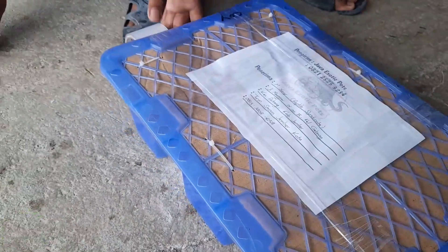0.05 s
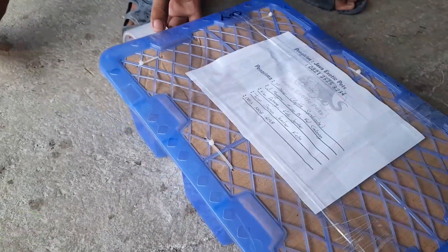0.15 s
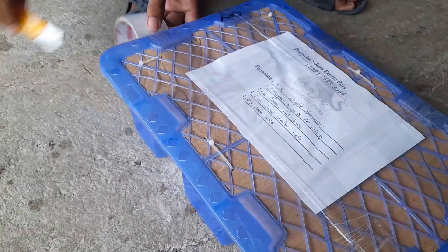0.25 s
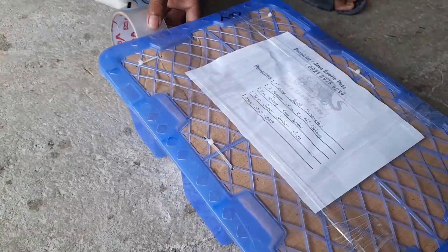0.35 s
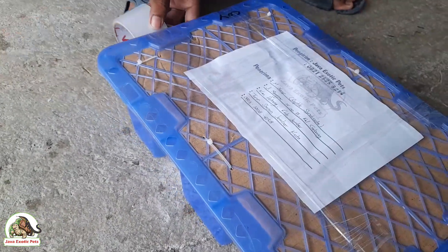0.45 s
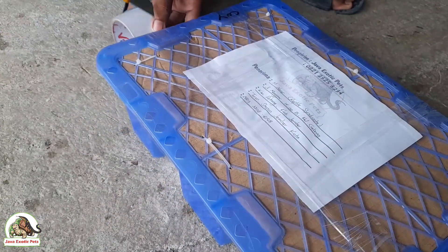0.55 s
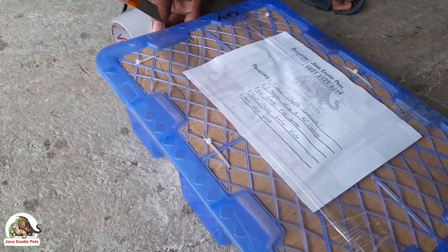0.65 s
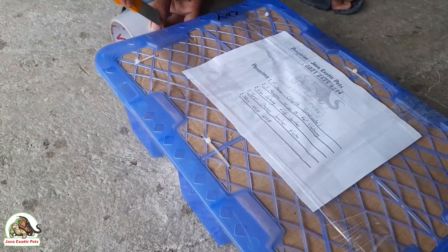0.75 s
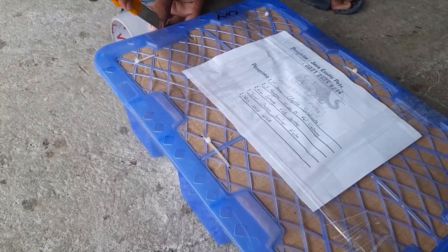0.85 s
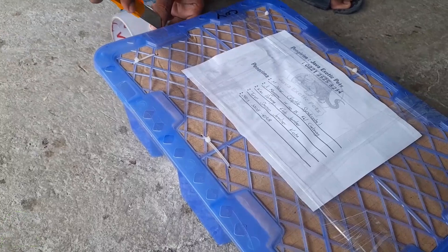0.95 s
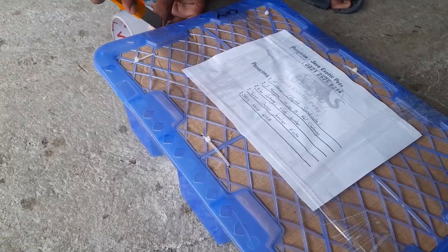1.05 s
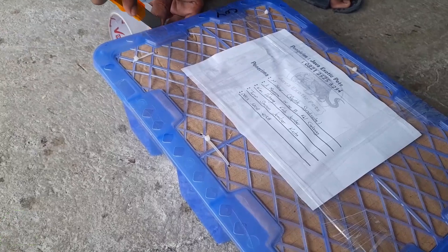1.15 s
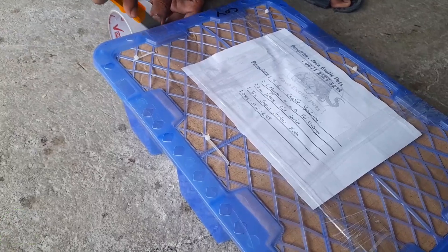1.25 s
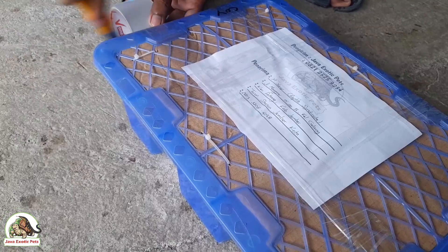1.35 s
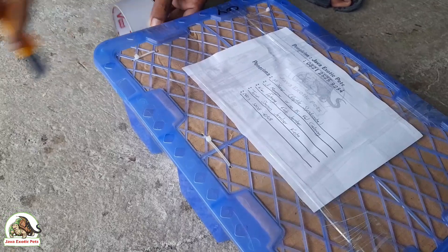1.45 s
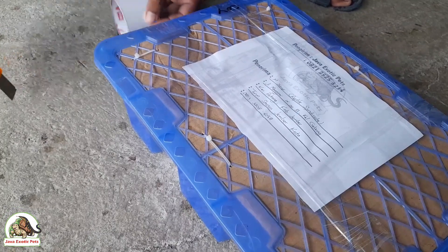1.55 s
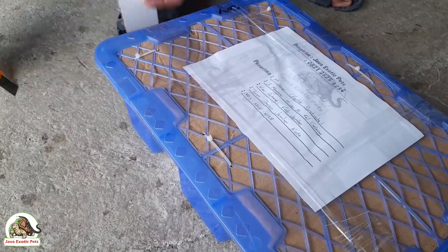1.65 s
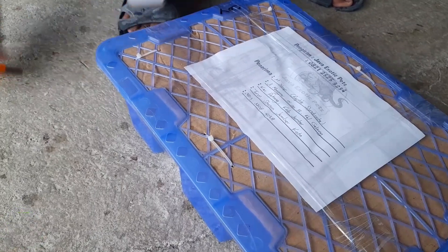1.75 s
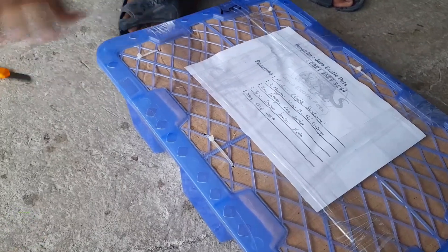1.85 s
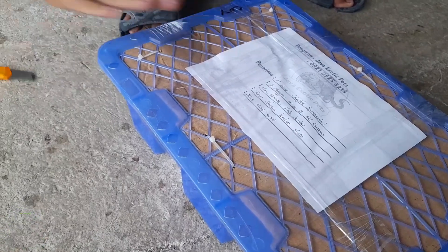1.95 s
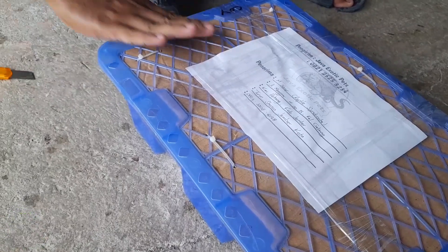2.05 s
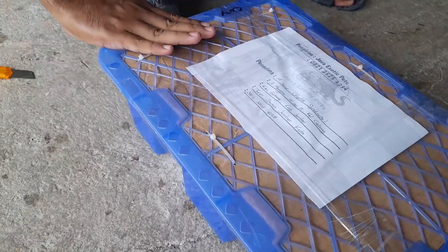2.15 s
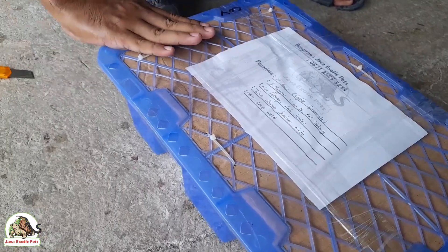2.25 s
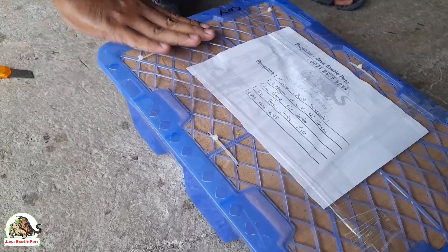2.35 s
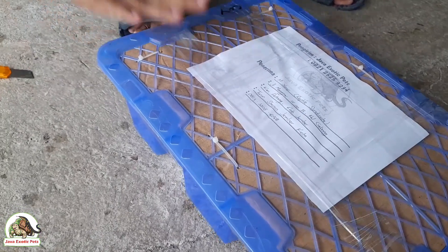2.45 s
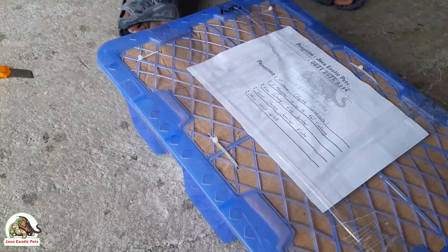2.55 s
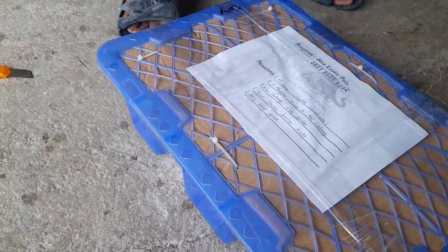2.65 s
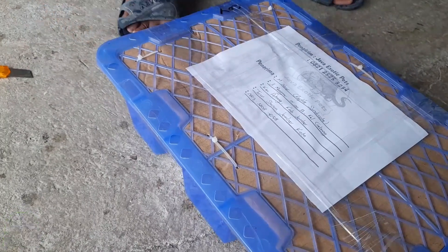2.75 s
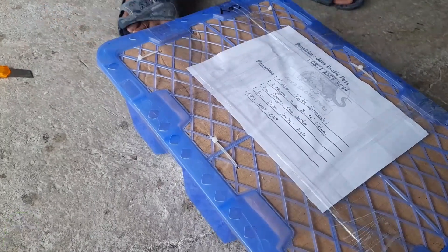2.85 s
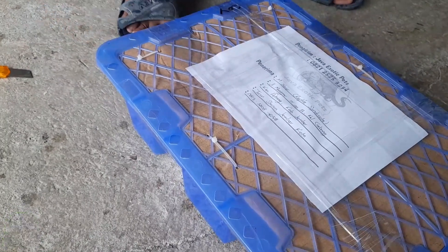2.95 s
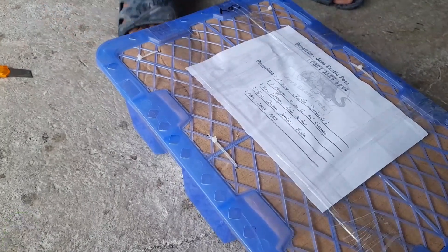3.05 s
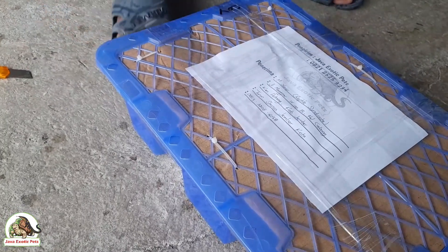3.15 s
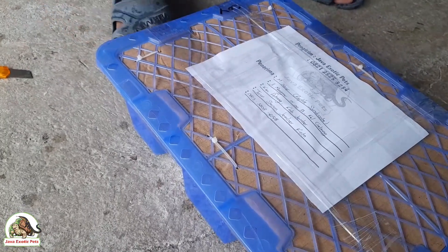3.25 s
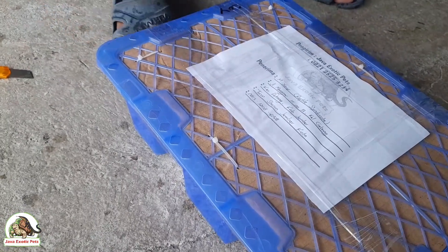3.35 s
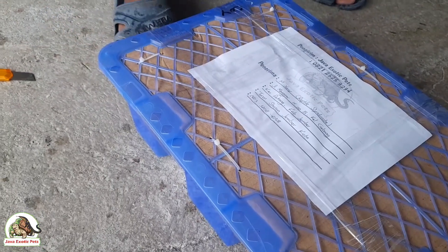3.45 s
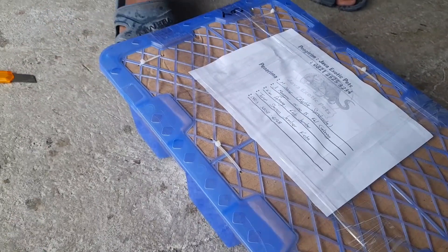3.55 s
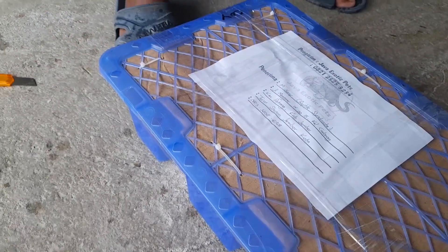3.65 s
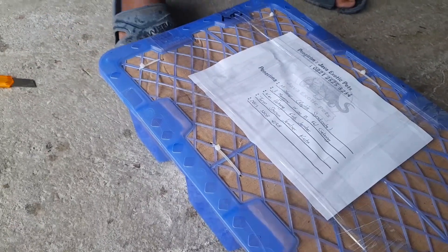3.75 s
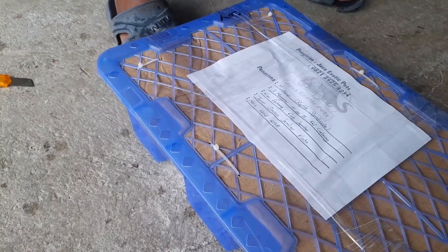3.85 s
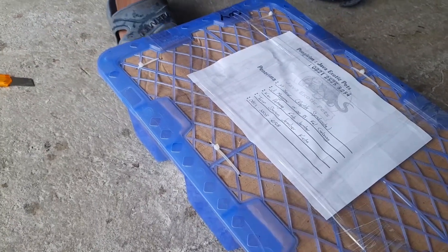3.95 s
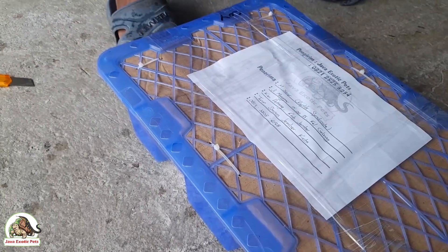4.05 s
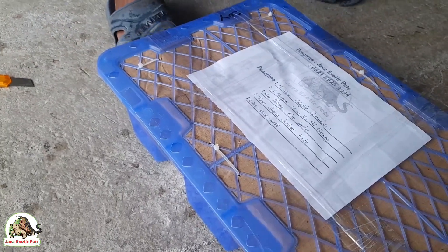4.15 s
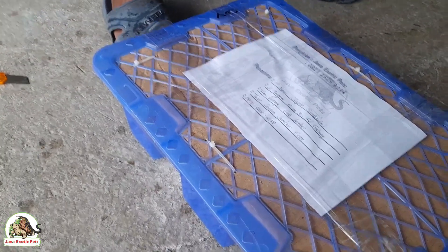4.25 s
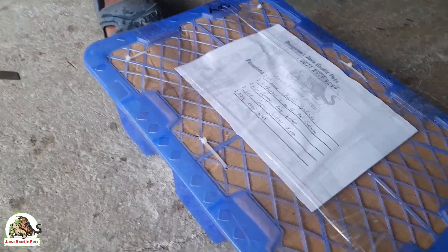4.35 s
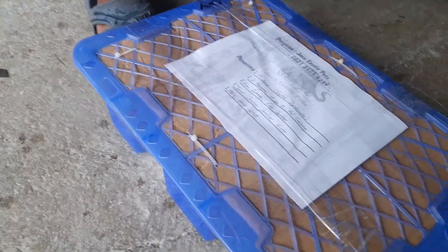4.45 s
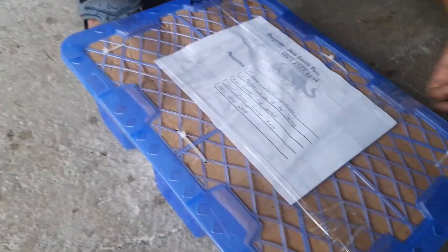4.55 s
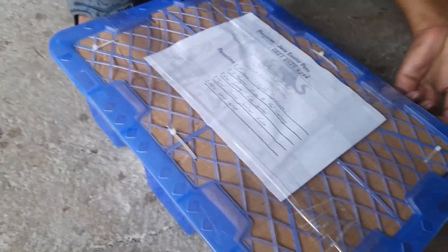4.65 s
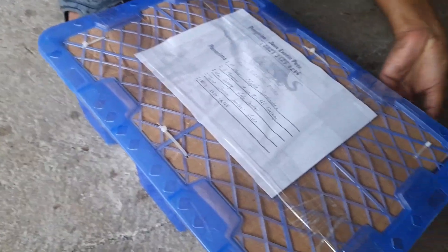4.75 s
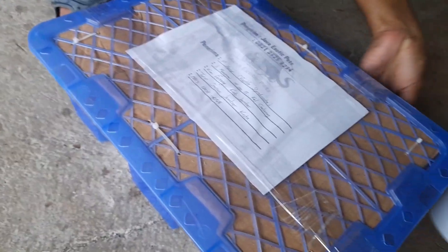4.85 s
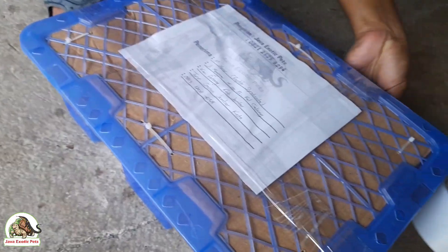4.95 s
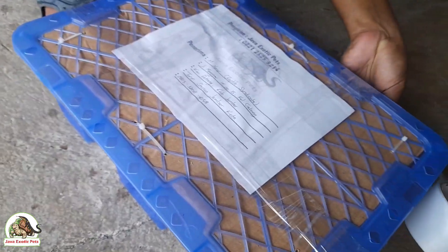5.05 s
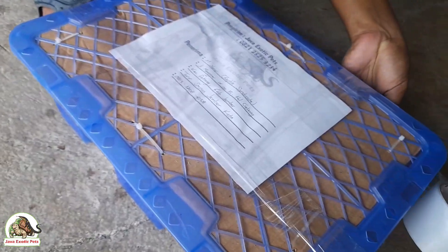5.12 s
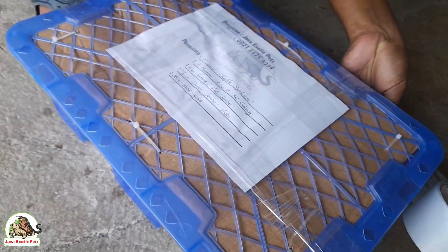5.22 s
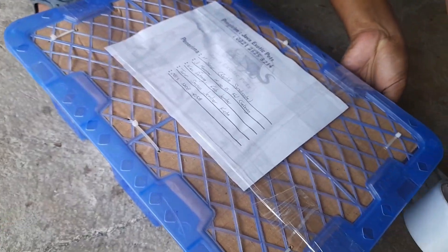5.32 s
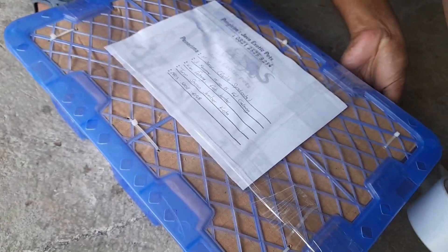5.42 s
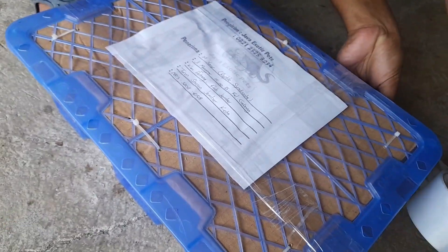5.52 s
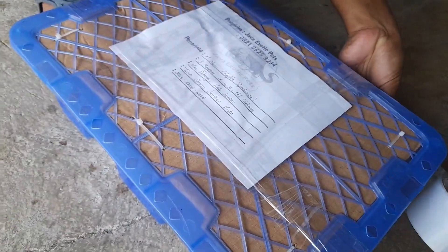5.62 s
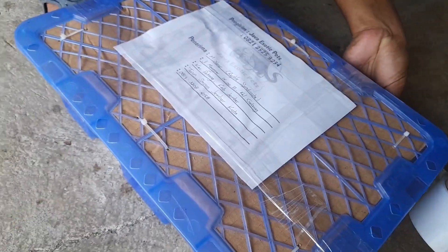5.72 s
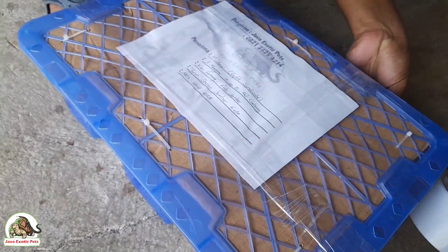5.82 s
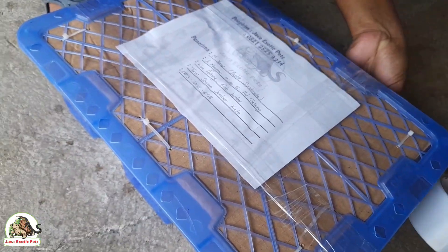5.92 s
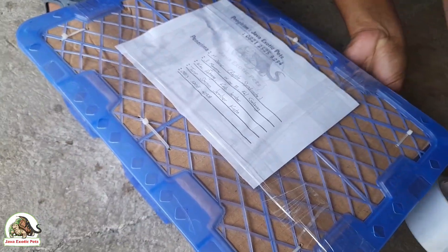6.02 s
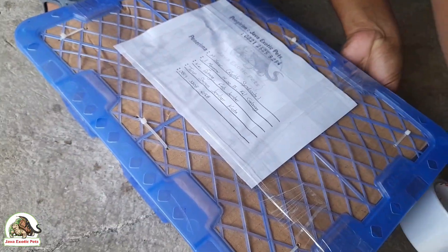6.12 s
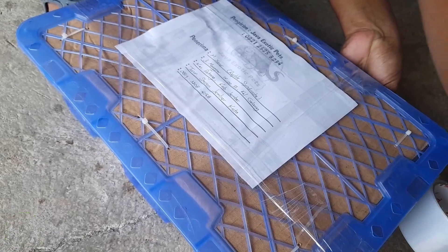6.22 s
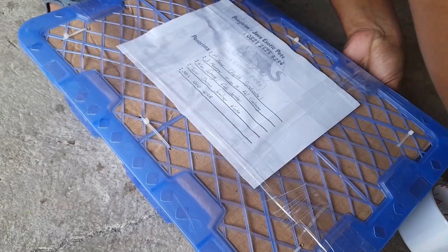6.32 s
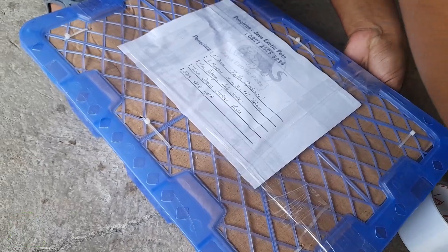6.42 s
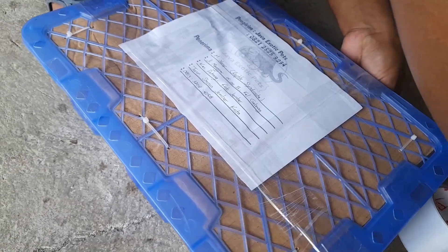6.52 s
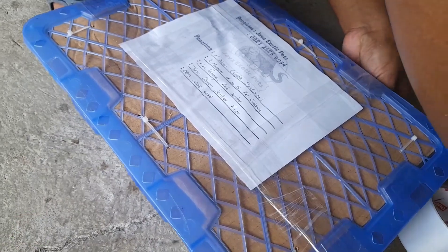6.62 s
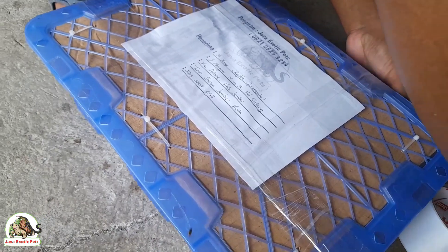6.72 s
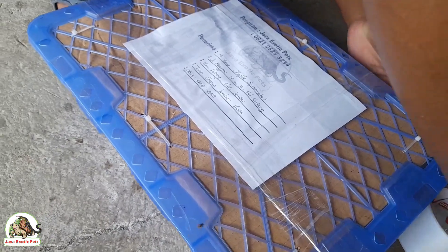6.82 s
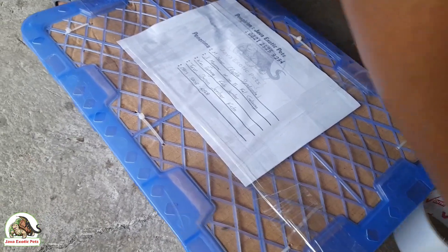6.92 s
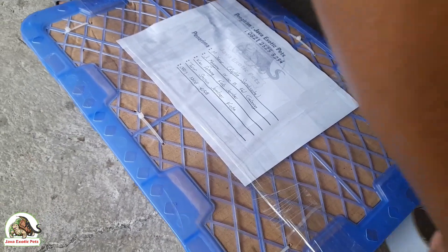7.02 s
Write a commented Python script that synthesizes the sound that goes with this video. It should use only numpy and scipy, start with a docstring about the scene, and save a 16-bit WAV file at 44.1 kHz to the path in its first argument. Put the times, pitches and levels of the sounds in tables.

```python
"""Sticky tape is peeled off a roll, cut and smoothed over a label on a plastic crate that stands on concrete.
Releases are bursts of shaped noise over fine crackle and the hands' rustle; knocks ring the crate's modes;
strokes are swelling hiss and shake; hard walls answer with decaying noise.
Behind: traffic rumble and hiss in shaped noise; a hum, a low throb and an engine drone in drifting sines;
a far call, perhaps a rooster, in blurred lines."""
import sys
import numpy as np
from scipy import signal
from scipy.fft import rfft, irfft, next_fast_len
from scipy.io import wavfile
from scipy.ndimage import map_coordinates

SR = 44100
rng = np.random.default_rng(int(sys.argv[2]) if len(sys.argv) > 2 else 0)


def store_wav(level_fs):
    """Save 16-bit WAV to argv[1]."""
    pcm = np.round(np.clip(np.atleast_2d(level_fs), -1, 1) * 32767)
    wavfile.write(sys.argv[1], SR, pcm.T.astype(np.int16))


def level_to_linear(level):
    """Convert decibel levels to linear amplitude factors, elementwise."""
    exponent = np.asarray(level, float) / 20
    return 10 ** exponent


N = 312212  # samples

# tape letting go of the roll or the label: t/s, level/dB, tearing decay of a full-size release/ms
SNAPS = [(0.093, -33.5, 12), (0.1148, -25, 14), (.139, -17.5, 4), (0.3407, -32.5, 1.7), (0.4, -25, 1.8),
         (0.479, -30, 5.9), (0.7538, -37.5, 5), (0.9697, -37.5, 2.3), (1.119, -42, 9), (1.337, -32, 3.2),
         (1.3938, -25.5, 1.5), (1.4561, -25, 0.81), (1.7422, -29.5, 7.9), (1.821, -12, 7.7),
         (1.8422, -8, 5.8), (1.9067, -16, 2), (1.931, -10.5, 4), (1.9709, -15, 0.72), (2.0569, -18, 10),
         (2.0802, -19, 2.4), (2.6745, -37.5, 3), (2.8958, -40.5, 0.58), (3.0988, -31, 2.5),
         (3.387, -39.5, .7), (3.499, -30.5, .7), (3.7932, -34, 1.9), (3.8842, -29, 2.2), (3.98, -35.5, 8.1),
         (4.0045, -21.5, 1.7), (4.0281, -24, 1.6), (4.0502, -19, 1.2), (4.096, -13, 1.3),
         (4.4101, -17, 3.8), (4.4266, -6, 6), (4.4496, -8.5, 3.6), (4.4733, -8, 4), (4.7718, -36.5, 2),
         (5.9, -50.5, 2.1), (6.6655, -29.5, 2.5)]
# blows on the crate: t/s, level/dB, hardness/dB
KNOCKS = [(0.26, -34.5, -12), (.32, -39.5, -6), (0.447, -37, -15), (.511, -38, -9.5), (.62, -42.5, 3.5),
          (0.66, -33, -9.5), (1.124, -23, -18.5), (1.452, -25.5, -15.5), (1.486, -33.5, 3),
          (1.491, -10, -26), (2.262, -31.5, -16), (2.504, -28, -20), (2.515, -26.5, -23),
          (4.396, -4.5, -14.5), (4.4, -6, -7.5), (4.409, -11, 4), (4.422, -11.5, -6), (4.444, -20, 11),
          (4.469, -21, 11), (6.427, -32, -5.5), (6.544, -27, -16.5), (6.664, -34.5, 4)]
# skin or plastic sliding: start t/s, end t/s, hiss level/dB, crate shake level/dB
STROKES = [(1.111, 1.15, -52.5, -39), (1.183, 1.27, -49.5, -50), (1.268, 1.524, -46.5, -46),
           (2.204, 2.36, -29.5, -34.5), (2.34, 2.403, -26.5, -39.5), (2.392, 2.441, -33.5, -41.5),
           (4.366, 4.415, -43, -21.5), (4.423, 4.507, -18, -23.5), (5.655, 5.946, -69, -62),
           (6.525, 6.637, -50.5, -39), (6.665, 6.719, -40, -39), (6.896, 7.001, -43, -28.5),
           (6.985, 7.036, -46, -32)]
# spells of handling the tape: start t/s, end t/s, crackle level/dB, rustle of hands and paper level/dB
SPELLS = [(0.118, 0.803, -69.5, -51.5), (1.026, 1.501, -59.5, -56), (1.761, 2.199, -45.5, -57),
          (3.0, 3.499, -58.5, -54), (3.778, 4.365, -59.5, -53), (4.454, 4.795, -65, -56),
          (5.95, 7.078, -73.5, -59.5)]
# traffic: t/s, rumble level/dB
STREET = [(0, -59.5), (.4, -59), (.9, -61.5), (2.2, -46), (2.7, -55), (4.1, -45), (4.95, -59.5), (5.6, -60),
          (6, -49), (7.08, -43.5)]
# engine drone: t/s, mean firing f/Hz, level/dB
DRONE = [(5.5, 60.1, -69), (5.892, 59.46, -55), (6.9, 59.77, -56)]
# engine orders 1-6: relative level/dB
ORDER_DB = [2, 7, 3.5, -1.5, -1, -3]
# hum lines: mean f/Hz, relative level/dB
HUM_LINES = [(151, -3), (188, -15.5), (366, -15), (580, -20.5)]
# swells of the hum: peak t/s, half width at 1/e/s, level/dB
HUM_SWELLS = [(2.4, 0.21, -45), (3.601, .5, -42), (6.601, 0.053, -33)]
# notes of a far call, perhaps a rooster: start t/s, end t/s, mean f/Hz, starting level/dB
CALL = [(-.1, .2, 563, -61), (.2, 1.3, 745, -60)]
# the call's harmonics from the first: relative level/dB
OVERTONE_DB = [0, -11, -19]
# crate resonances: f/Hz, width/Hz, level/dB
CRATE = [(90, 28, -9.5), (223, 66, 0.5), (603, 70, 5), (731, 59, 5.5), (1080, 56, 2.5), (1882, 150, -1.5)]
# taped label ringing under the hand: f/Hz, width/Hz, level/dB
SHEET = [(1310, 250, 1), (3960, 250, 1), (4930, 200, 0.5)]
# spectrum of tearing glue: f/Hz, level per Hz/dB
TAPE = [(500, -29.5), (1500, -22), (2270, 0.5), (4330, 3.5), (9000, -2.5), (15600, -8.5)]
# spectrum of sliding skin: f/Hz, level per Hz/dB
SKIN = [(200, -28), (400, -11.5), (1250, -9.5), (4000, -11), (6000, -15), (15600, -28)]
# crate walls under a sliding load: f/Hz, level per Hz/dB
DRAG = [(60, -14), (270, -2.5), (450, -7), (730, -11), (1200, -13), (2500, -26.5), (8000, -49)]
# spectrum of traffic rumble: f/Hz, level per Hz/dB
TRAFFIC = [(25, -37), (52, -12), (150, -6.5), (210, -13.5), (310, -11.5), (600, -21), (900, -37),
           (1300, -81)]
# spectrum of far hiss, shared by the hands' rustle: f/Hz, level per Hz/dB
FAR_HISS = [(500, -8), (900, -7), (2500, -7), (5000, -15), (15000, -21.5)]
# likeness of the two ports: f/Hz, correlation/1
ALIKE = [(30, 0.022), (70, 0.92), (150, 0.62), (290, .85), (640, 0.33), (1400, 0.23), (3000, 0)]
# decay of the walls' answer: f/Hz, t60/s
WALLS = [(150, 0.25), (1000, 0.49), (5000, 0.32), (12000, 0.32)]
# crack of a hard contact: f/Hz, level/dB
CRACK = [(300, -36.0), (1200, 11.0), (3000, 6.5), (8000, -18.5)]

HISS_DB, HISS_GROWTH_DB_PER_DB = -64.5, 1  # at the mean rumble level; per dB of rumble
HUM_REST_DB = -56.5
THROB_HZ, THROB_DB = 66, -60.5  # means
CALL_FADE_DB_PER_S = 8
BUILD_S, AFTER_DB, AFTER_S = 0.0026, -14.5, 0.022  # strain before a full-size release; ragged trail
TICKS_PER_S, TICK_DB, TICK_SPREAD_DB, TICK_MS = 22, 12.5, 4.5, 0.66  # dB over crackle; mean ms
TAPS_PER_S, TAP_DB, TAP_SPREAD_DB, TAP_HARD_DB = 12, 9, 2, -14  # dB over rustle; mean hardness
REST_DB = -95  # crackle floor
SPELL_RISE_S, SPELL_FALL_S = 0.15, 0.064


def unit(x):
    """Scaled to rms 1."""
    return x / np.sqrt(np.mean(x ** 2) + 1e-20)


def along(points, hz):
    """(f/Hz, value) points on a log axis."""
    f, v = np.transpose(points)
    return np.interp(np.log(hz + 1), np.log(f + 1), v)


def curves(rows):
    """One value per sample for each column after the time."""
    s, *cols = np.transpose(rows)
    return [np.interp(np.arange(N) / SR, s, c) for c in cols]


def wobble(rate):
    """Smooth random curve, rate knots a second."""
    return map_coordinates(rng.standard_normal(N // 50), [np.arange(N) * rate / SR])


def drifting_turns(hz, depth, rate):
    """Phase in turns of a tone whose pitch drifts by the fraction depth."""
    return np.cumsum(hz * (1 + depth * wobble(rate))) / SR


def filtered(x, response):
    """x through a complex response of frequency."""
    m = next_fast_len(N + SR // 2)
    return irfft(rfft(x, m) * response(np.fft.rfftfreq(m, 1 / SR)), m)[..., :N]


def colour(points):
    """Gain of a (f/Hz, level/dB) spectrum."""
    return lambda hz: level_to_linear(along(points, hz))


def modes(table):
    """Causal response of (f/Hz, width/Hz, level/dB) resonances, alternating in sign."""
    def response(f):
        total = 0
        for k, (centre, width, db) in enumerate(table):
            damping = 1j * f * width
            total = total + (-1) ** k * level_to_linear(db) * damping / (centre ** 2 - f ** 2 + damping)
        return total
    return response


def half_angle(hz):
    """Mid/side mixing angle that gives the ports the correlation of ALIKE."""
    return np.arccos(np.clip(along(ALIKE, hz), -1, 1)) / 2


def pair(response, grain_db):
    """Stereo noise of rms 1, correlated as in ALIKE, in lumps of random size shared by both ports."""
    lumps = level_to_linear(grain_db * wobble(260))
    noise = lumps * rng.standard_normal((2, N))
    mid, side = filtered(noise, lambda hz: response(hz) * [np.cos(half_angle(hz)), np.sin(half_angle(hz))])
    return unit(np.array([mid + side, mid - side]))


def spell(start, end):
    """Rises from the start, holds, dies away after the end."""
    t = np.arange(N) / SR
    return np.clip((t - start) / SPELL_RISE_S, 0, 1) * np.exp(-np.clip(t - end, 0, None) / SPELL_FALL_S)


def traffic():
    """Many far sources blur into low rumble and a hiss that follows its level."""
    rumble_db, = curves(STREET)
    hiss_db = HISS_DB + HISS_GROWTH_DB_PER_DB * (rumble_db - rumble_db.mean())
    rumble = level_to_linear(rumble_db + 2 * wobble(8)) * pair(colour(TRAFFIC), grain_db=-0.5)
    hiss = level_to_linear(hiss_db + 1.5 * wobble(10)) * pair(colour(FAR_HISS), grain_db=1.5)
    return rumble + hiss


def hum():
    """Steady lines, wavering in level and pitch, swell together."""
    t = np.arange(N) / SR
    gain = level_to_linear(HUM_REST_DB) + sum(level_to_linear(db) * np.exp(-((t - s) / half) ** 2) for s, half, db in HUM_SWELLS)
    lines = sum(level_to_linear(db + 0.8 * wobble(16)) * np.sin(2 * np.pi * drifting_turns(hz, 0.003, 4))
                for hz, db in HUM_LINES)
    return gain * lines


def throb():
    """One low sine, unsteady in level and pitch."""
    return level_to_linear(THROB_DB + 2.8 * wobble(19)) * np.sin(2 * np.pi * drifting_turns(THROB_HZ, 0.056, 10))


def far_call():
    """Each note is a blurred, drifting line with weak overtones, fading as it goes."""
    out, t = 0, np.arange(N) / SR
    for start, end, hz, db in CALL:
        phase = 2 * np.pi * drifting_turns(hz, 0.012, 7)
        note = 0
        for k, over_db in enumerate(OVERTONE_DB, 1):
            in_phase = (0.8 + 0.8 * wobble(60 * k)) * np.sin(k * phase)
            quadrature = 0.8 * wobble(60 * k) * np.cos(k * phase)
            note = note + level_to_linear(over_db) * (in_phase + quadrature)
        out = out + level_to_linear(db - CALL_FADE_DB_PER_S * (t - start)) * spell(start, end) * note
    return out


def ticks():
    """Small releases at random moments after each spell's rise, as rows like SNAPS."""
    rows = []
    for start, end, crackle_db, _ in SPELLS:
        when, size, length = rng.random((round(TICKS_PER_S * (end - start)), 3)).T
        at_s = end - when * (end - start - SPELL_RISE_S)
        level_db = crackle_db + TICK_DB - TICK_SPREAD_DB * np.log(size + 0.14)
        rows += zip(at_s, level_db, TICK_MS * (0.5 + length))
    return rows


def tape_snaps():
    """Glue strains, tears for milliseconds and lets go; small releases are shorter and brighter."""
    near, far = np.zeros((2, N + SR)), np.zeros(N)
    t = np.arange(-SR // 50, SR // 10) / SR
    for s, db, tear_ms in SNAPS + ticks():
        size = np.clip((db + 45) / 35, 0, 1)
        fall_s = tear_ms / 1000
        shape = np.exp(np.where(t < 0, t / BUILD_S, -t / fall_s) / (0.55 + 0.45 * size))
        ragged = level_to_linear(4 * np.repeat(rng.standard_normal(len(t) // 100 + 1), 100)[:len(t)])
        after = level_to_linear(AFTER_DB) * (t > 0) * np.exp(-t / AFTER_S) * ragged
        noise = rng.standard_normal(len(t))
        glue = unit(noise - 0.39 * (1 - size) * np.roll(noise, 1))
        burst = level_to_linear(db + 3.5) * (shape + after) * glue
        at = round(s * SR) - SR // 50
        lag = rng.integers(3, 15)  # samples; earlier but weaker at the left port
        near[0, at - lag:at - lag + len(t)] += level_to_linear(-2.5) * burst
        near[1, at:at + len(t)] += burst
        # the walls receive each release as one pulse
        pulse = unit(np.array([1, 0.7 * (size - 1)]))
        far[round(s * SR):][:2] += level_to_linear(db) * (fall_s / 0.0059) ** 0.5 * np.linalg.norm(shape) * pulse
    level = np.sqrt(np.mean(colour(TAPE)(np.linspace(2500, 14000, 99)) ** 2))
    close = filtered(near[:, :N], lambda hz: colour(TAPE)(hz) ** 0.65) / level ** 0.65  # fuller close by
    return close, filtered(far, colour(TAPE)) / level


def walls(x):
    """The yard's answer: each frequency dies at its own speed, with a new tail every third of a second."""
    out, step, delay = np.zeros((2, N + 2 * SR)), SR // 3, round(0.006 * SR)
    for at in range(0, N, step):
        hz, t, (a, b) = signal.stft(rng.standard_normal((2, SR * 2 // 3)), SR, nperseg=256)
        angle = half_angle(hz)[:, None]
        mid, side = np.cos(angle) * a, np.sin(angle) * b
        fall = level_to_linear(-60 * t / along(WALLS, hz)[:, None]) * (1 - np.exp(-t / 0.004))  # echoes thicken, then die
        tail = signal.istft(np.array([mid + side, mid - side]) * fall, SR, nperseg=256)[1]
        piece = signal.fftconvolve(x[None, at:at + step], tail / np.linalg.norm(tail[0]), axes=1)
        out[:, at + delay:at + delay + piece.shape[1]] += piece
    return out[:, :N]


def crackle_and_rustle():
    """Clumped fine noise for tiny releases as tape is stretched and pressed; lumpy noise for the hands."""
    fine = level_to_linear(REST_DB) + sum(level_to_linear(db) * spell(start, end) for start, end, db, _ in SPELLS)
    rustle = sum(level_to_linear(db) * spell(start, end) for start, end, _, db in SPELLS)
    crackle_noise = pair(lambda hz: colour(TAPE)(hz) * (hz / 6000) ** 0.25, grain_db=0)
    rustle_noise = pair(colour(FAR_HISS), grain_db=4.5)
    return fine * level_to_linear(3.5 * wobble(30)) * crackle_noise + rustle * level_to_linear(2.5 * wobble(14)) * rustle_noise


def taps():
    """Light fingertip blows at random moments after each spell's rise, as rows like KNOCKS."""
    rows = []
    for start, end, _, rustle_db in SPELLS:
        when, size, hard = rng.random((round(TAPS_PER_S * (end - start)), 3)).T
        at_s = end - when * (end - start - SPELL_RISE_S)
        level_db = rustle_db + TAP_DB - TAP_SPREAD_DB * np.log(size + 0.15)
        rows += zip(at_s, level_db, TAP_HARD_DB * (0.5 + hard))
    return rows


def crate_knocks():
    """A push rings the crate's modes; a harder contact pushes more briefly and cracks louder."""
    push, crack = np.zeros(N + SR), np.zeros(N + SR)
    t = np.arange(SR // 30) / SR
    for s, db, hard_db in KNOCKS + taps():
        at = round(s * SR)
        u = t / (0.000096 * level_to_linear(-0.7 * hard_db))
        force = u * np.exp(-u)
        push[at:at + len(t)] += level_to_linear(db + 37) * force / np.sum(force)
        crack[at:at + len(t)] += level_to_linear(db + hard_db) * np.exp(-t / 0.005) * rng.standard_normal(len(t))
    return filtered(push[:N], modes(CRATE)) + filtered(crack[:N], colour(CRACK))


def rubbing():
    """Each stroke swells and stops: the skin hisses and the crate's walls shake."""
    t, hiss_gain, shake_gain = np.arange(N) / SR, 0, 0
    for start, end, hiss_db, shake_db in STROKES:
        stroke = np.sin(np.pi * np.clip((t - start) / (end - start), 0, 1)).clip(0) ** 0.85
        hiss_gain = hiss_gain + level_to_linear(hiss_db) * stroke
        shake_gain = shake_gain + level_to_linear(shake_db) * stroke
    shake = pair(lambda hz: colour(DRAG)(hz) * (1 + 1.1 * np.abs(modes(CRATE)(hz))), grain_db=2.5)
    hiss = pair(lambda hz: colour(SKIN)(hz) * (1 + np.abs(modes(SHEET)(hz))), grain_db=2.2)
    return level_to_linear(1.5 * wobble(40)) * (hiss_gain * hiss + shake_gain * shake)


def engine_drone():
    """Low multiples of a drifting firing rate, each wavering in level."""
    firing_hz, drone_db = curves(DRONE)
    phase = 2 * np.pi * drifting_turns(firing_hz, 0.003, 4)
    orders = sum(level_to_linear(db + 3.3 * wobble(11)) * np.sin((k + 1) * phase + k * k) for k, db in enumerate(ORDER_DB))
    first_s, last_s, fade_s = DRONE[0][0], DRONE[-1][0], 0.18
    present = np.interp(np.arange(N) / SR, [first_s - fade_s, first_s, last_s, last_s + fade_s], [0, 1, 1, 0])
    return level_to_linear(drone_db) * present * orders


def scene():
    """Close sounds with their echo, over the street."""
    street = traffic() + hum() + throb() + engine_drone()
    tape, tape_far = tape_snaps()
    crate, rub = crate_knocks(), rubbing()
    echo = walls(tape_far + level_to_linear(-7) * crate + level_to_linear(-6.5) * rub[1])
    return tape + crate + rub + echo + crackle_and_rustle() + street + far_call()


def roll_off(x):
    """The treble ends steeply here."""
    return signal.sosfilt(signal.butter(12, 15730, fs=SR, output="sos"), x)


def record(dry):
    """The right port is a little more sensitive; the loudest peaks saturate."""
    x = dry * level_to_linear([[-0.8], [0.8]])
    mix = x / (1 + np.abs(x) ** 8) ** (1 / 8)
    return roll_off(mix)


dry = scene()
out = record(dry)
store_wav(out)
```